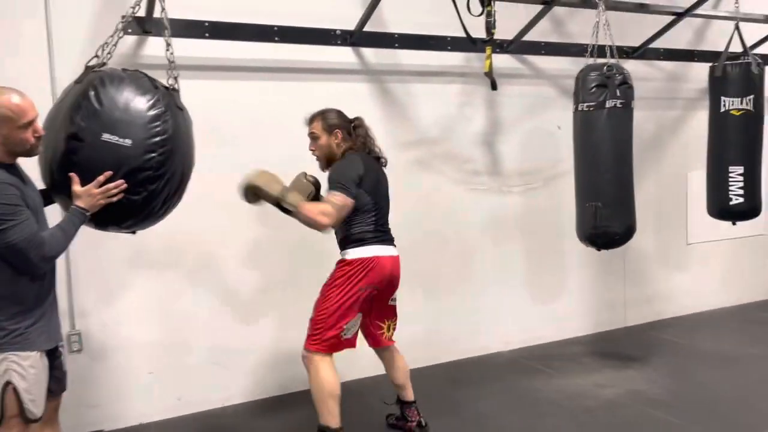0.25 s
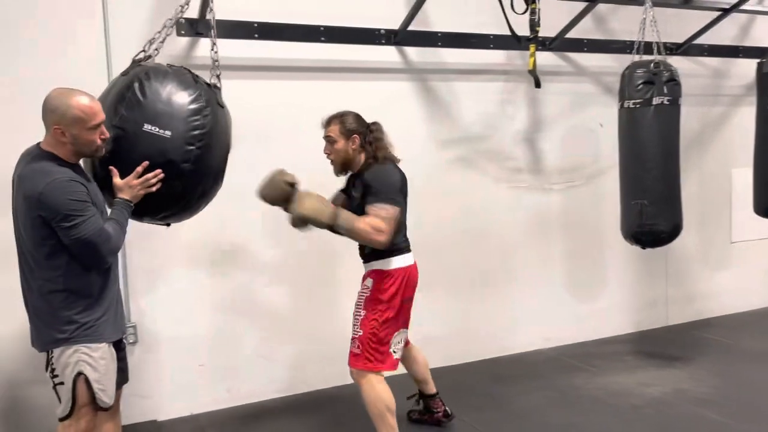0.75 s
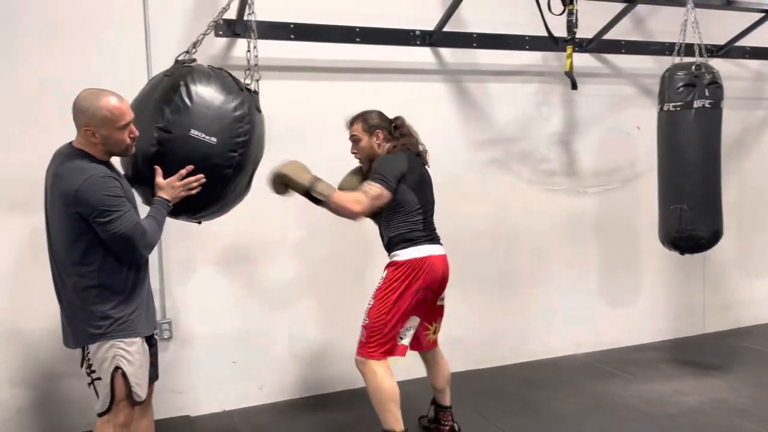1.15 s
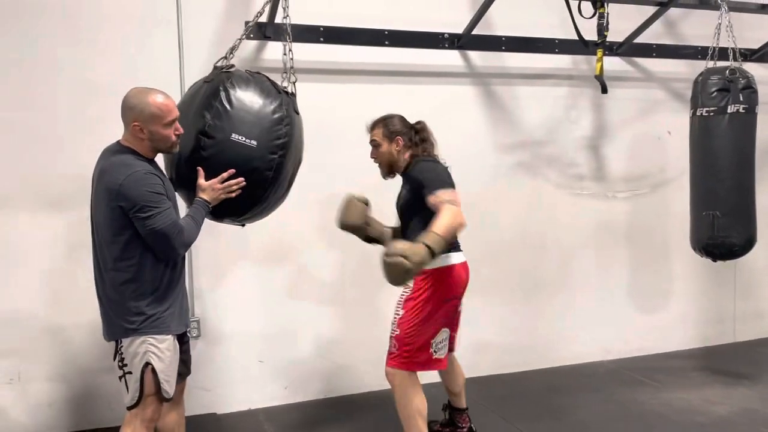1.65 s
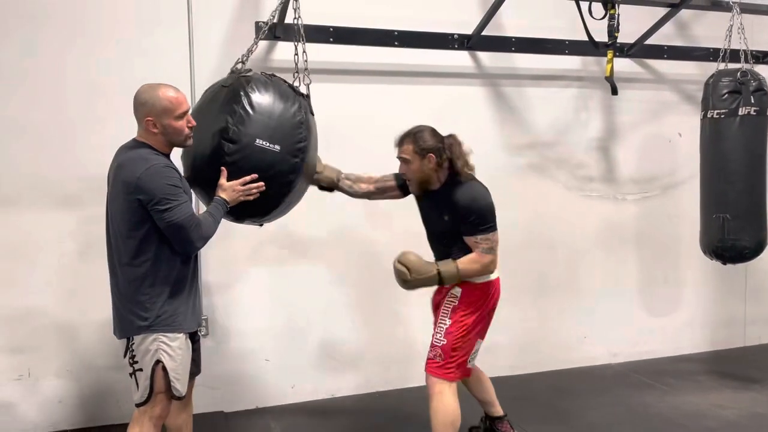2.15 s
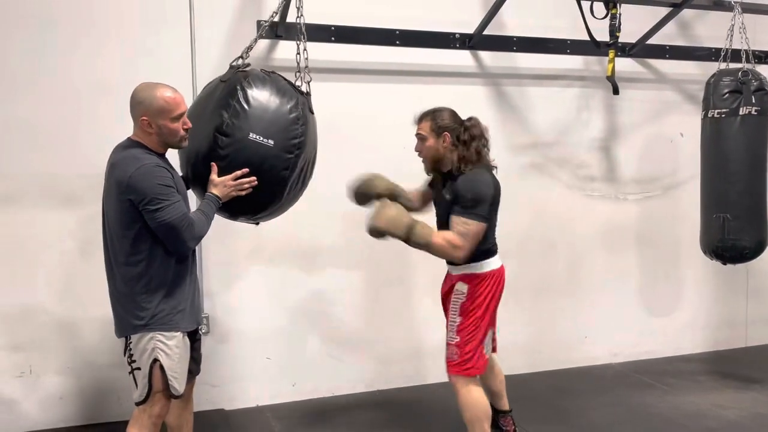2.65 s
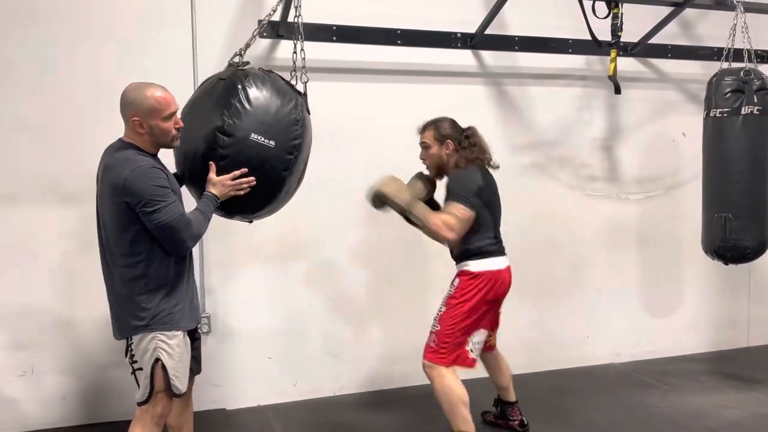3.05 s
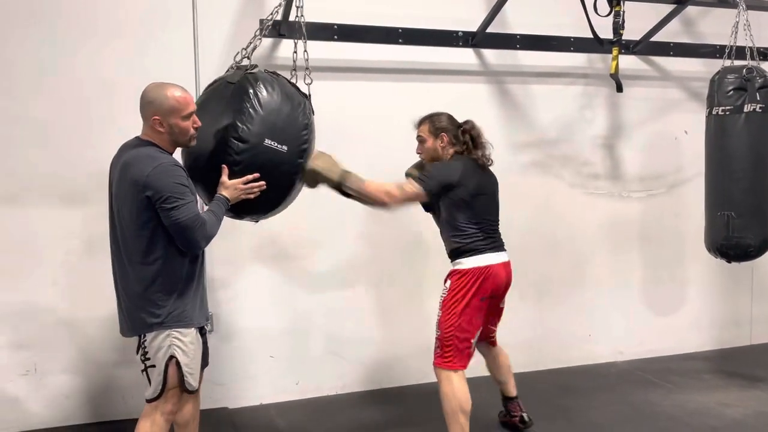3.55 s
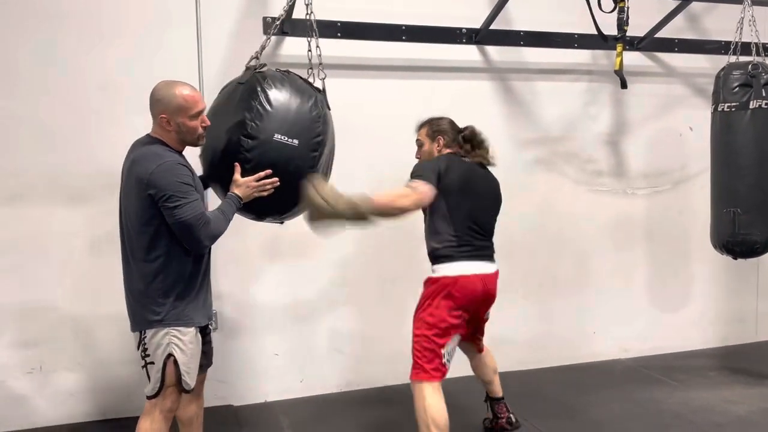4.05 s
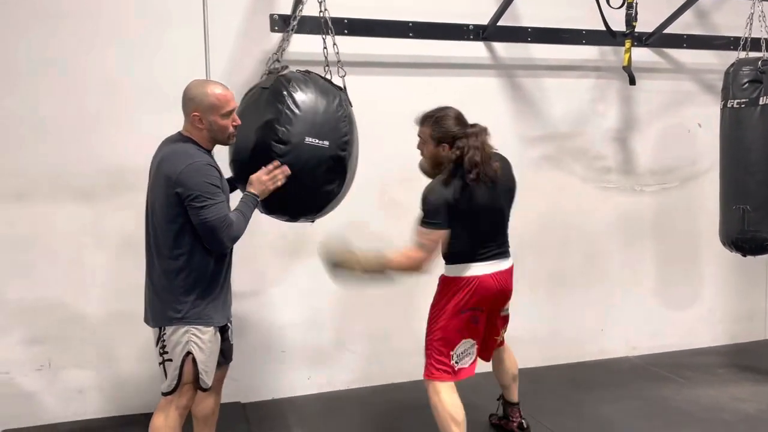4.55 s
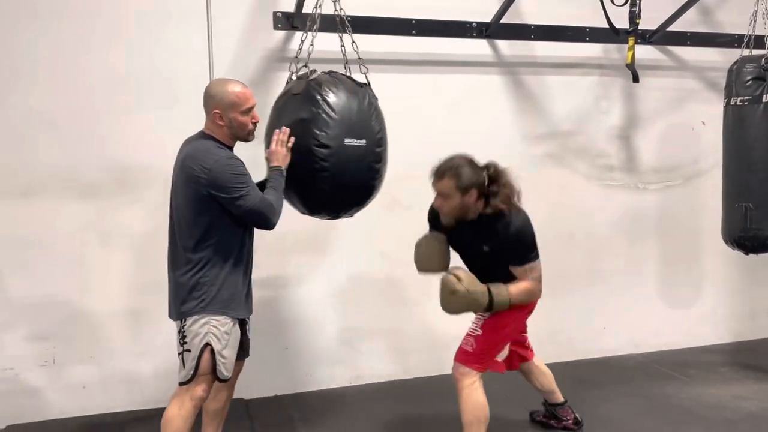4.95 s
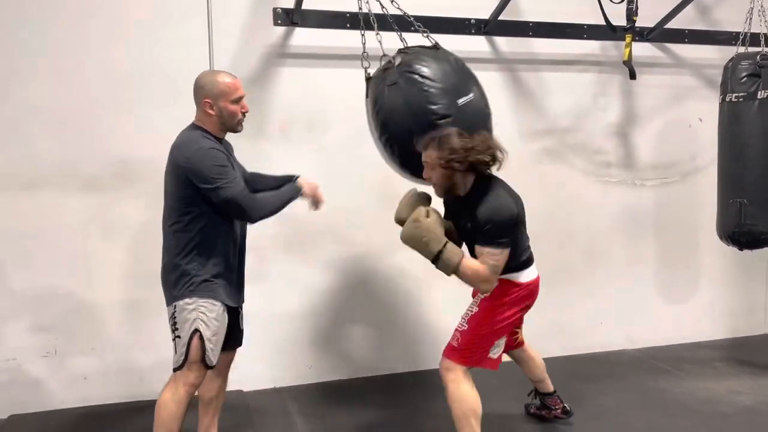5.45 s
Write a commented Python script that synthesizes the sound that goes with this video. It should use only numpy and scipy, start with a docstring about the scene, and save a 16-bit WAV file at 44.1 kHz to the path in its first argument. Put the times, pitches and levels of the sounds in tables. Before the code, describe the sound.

A heavy bag is punched in a hard-walled, reverberant gym, heard in stereo from a few metres away, the bag a little left of centre. The tail of a weak blow opens the scene, then punches land roughly every 0.3 seconds from 0.3 to 2.7, each a leathery slap with a short, hollow, padded knock and low boom. Strength varies; the blow at 2.1 is notably hard and snappy, and a small dry tick comes at 1.2. Spacing widens with blows at 3.1 and 3.6, then two powerful ones at 4.1 and 4.6, the last deepest. Soft low footfalls dot the mat. From 4.63 the chains jerk: bright links jangle and grind, with a hollow bonk and steel clatter near 4.72, then thinning clanks and tiny high squeaks until about 5.1. A faint rubbery shoe chirp comes at 5.35. Low ventilation rumble continues under the fading ring of the room.

```python
"""A heavy bag on chains takes a boxer's blows, a few metres away in a hard-walled gym.
Each blow mixes a burst of noise (the slap), short ringing tones (the knock) and a slow low boom.
After the last blow the bag drops back on its chains: steel tones jangle and wavering tones creak.
Feet land softly, and filtered noise rumbles as ventilation under the long ring of the hall."""
import sys
import numpy as np
from scipy import signal
from scipy.fft import rfft, irfft, next_fast_len
from scipy.io import wavfile
from scipy.ndimage import uniform_filter1d

SR = 44100
rng = np.random.default_rng(int(sys.argv[2]) if len(sys.argv) > 2 else 0)


def waveform_to_disk(signal):
    """Save audio, clipped to [-1, 1], as 16-bit WAV at the path in sys.argv[1]."""
    frames = np.transpose(np.atleast_2d(signal))
    scaled = np.clip(frames, -1, 1) * 32767
    samples = np.round(scaled).astype(np.int16)
    wavfile.write(sys.argv[1], SR, samples)


N = 250929
T = np.arange(N) / SR  # time in seconds

# Colour of a slap. Each row: frequency in Hz, level in dB.
SLAP_COLOUR = [(150, -7), (600, 5), (1200, 1.5), (2500, 1.5), (4000, -1), (6200, -2), (9000, 4),
               (12500, -9.5), (16000, -16)]


def undb(db):
    """Turn decibels into a gain."""
    return 10 ** (np.asarray(db) / 20)


def over_hz(hz, values, size=N):
    """Join points by straight lines over log frequency, nearly the way we hear pitch."""
    bins_hz = np.fft.rfftfreq(size, 1 / SR)
    return np.interp(np.log(bins_hz + 1), np.log(hz), values)


def colour(x, points):
    """Shape a sound by (Hz, dB) points with a filter that never acts early, so attacks stay sharp."""
    size = 2 * next_fast_len(x.shape[-1] // 2 + 2048)
    gain = undb(over_hz(*np.transpose(points), size=size))
    # folding the cepstrum (the spectrum of the log gain) gives the filter minimum phase
    cepstrum = irfft(np.log(gain))
    cepstrum[1:] *= 2 * (np.arange(1, size) < size / 2)
    shaped = irfft(rfft(x, size) * np.exp(rfft(cepstrum)))
    return shaped[..., :x.shape[-1]]


def slap_colour(tilt):
    """The slap's colour, tilted about 2 kHz by a number of dB per octave; positive is brighter."""
    return [(hz, db + tilt * np.log2(hz / 2000)) for hz, db in SLAP_COLOUR]


def unit(x):
    """Scale to an average power (rms) of 1."""
    return x / np.sqrt(np.mean(x ** 2))


def fade(t, t60):
    """Die away by 60 dB in t60 seconds."""
    return np.exp(-np.log(1000) * t / t60)


def swell(start, attack, hold, t60):
    """A loudness curve that rises, holds and dies away; all times in seconds."""
    t = T - start
    rise = np.clip(t / attack, 0, 1)
    return rise * fade(np.maximum(t - attack - hold, 0), t60)


def ring(modes, t):
    """A struck object sounds as several fading sines: (Hz, dB, t60 in seconds)."""
    return sum(undb(db) * np.sin(2 * np.pi * hz * t) * fade(t, t60) for hz, db, t60 in modes)


def add(track, at, sound):
    """Mix a mono or stereo sound in at a time, which may lie before the start."""
    i = int(at * SR)
    start = max(i, 0)
    part = sound[..., max(-i, 0):track.shape[-1] - i]
    track[..., start:start + part.shape[-1]] += part


def diffuse(size=N):
    """Noise from all around: left and right are alike in the bass, less so higher up."""
    # Stereo width. Each row: frequency in Hz, side minus middle level in dB.
    width = [(40, -34), (90, -18), (180, -14), (350, -5.5), (700, -1), (1500, -0.5), (3000, -4),
             (6000, -3.5), (11000, -0.5)]
    mid, side = rng.standard_normal((2, size))
    side = colour(side, width)
    return np.array([mid + side, mid - side])


def crack(t60):
    """Surfaces meeting make a short, dense burst of noise with a fairly even, unpitched spectrum."""
    t = T[:SR // 10]
    spectrum = rfft(rng.standard_normal(len(t)) * fade(t, t60))
    # a power of .7 takes out most of the peaks and dips
    burst = irfft(spectrum / np.abs(spectrum) ** .7) * fade(t, 4 * t60)
    return unit(burst) * np.sqrt(np.mean(fade(t, t60) ** 2))


def squeal(hz, waver):
    """Steel or rubber sticks and slips, which gives a thin tone of unsteady pitch."""
    drift = unit(uniform_filter1d(rng.standard_normal(N), size=200))
    pitch_hz = hz * (1 + waver * drift)
    return np.sin(2 * np.pi * np.cumsum(pitch_hz) / SR)


def ventilation():
    """Air rumbles as filtered noise that wavers a little, with the steady hum of its motor."""
    # Colour of the air. Each row: frequency in Hz, level in dB per Hz before overall scaling.
    air_colour = [(18, -48), (26, -26), (36, -14), (55, 6.5), (75, 3), (110, 0.5), (190, -4), (320, -8),
                  (650, -11), (1200, -17), (2200, -23), (4000, -30), (7000, -44), (12500, -53),
                  (15000, -79)]
    # Motor tones. Each row: frequency in Hz, rms level in dB.
    motor = [(53.8, -54.5), (123.8, -48.5)]
    level_db = -35
    waver_db = .7 * np.interp(T, np.linspace(0, T[-1], num=40), rng.standard_normal(size=40))
    air = unit(colour(diffuse(), air_colour)) * undb(level_db + waver_db)
    hum = 0
    for hz, db in motor:
        hum = hum + undb(db) * np.sqrt(2) * np.sin(2 * np.pi * (hz * T + rng.random()))
    return air + hum


def gym(x):
    """Hard walls answer with a dense tail whose treble dies soonest; every call has a new fine pattern."""
    # Bands of the hall. Each row: frequency in Hz, reverberation level in dB, t60 in seconds.
    bands = [(50, 11, 1.1), (131.3, 8.5, 0.79), (279, -4, 1.65), (660, -7, 3.3), (1230, 0, 2.6),
             (2300, 0.8, 2.1), (3400, 0.5, 2.6), (4700, -1.5, 1.22), (7600, -7, 0.66), (10500, -11, 0.54),
             (13000, -14, .36), (16000, -40, .2)]
    t = T[:SR]
    hz, db, t60 = np.transpose(bands)
    spectrum = rfft(diffuse(size=SR))
    # the tail starts after 4 ms and is stronger at first
    early = (1 + 1.0 * np.exp(-t / 0.12)) * np.clip((t - .004) / 0.0013, 0, 1)
    response = 0
    for share, band_db, band_t60 in zip(np.eye(len(hz)), db, t60):
        envelope = fade(t, band_t60) * early
        envelope /= np.sqrt(np.sum(envelope ** 2))
        band = irfft(spectrum * over_hz(hz, share, size=SR))
        response = response + undb(band_db) * envelope * band
    return signal.fftconvolve(x[None], response, axes=1)


def glove(tilt):
    """Knuckles slap first, the glove follows and the cover crumples; a flat landing is brighter."""
    crease_spread_db = 4  # unevenness of the creases
    skin, t = np.zeros(SR // 2), T[:SR // 10]
    grains = undb(crease_spread_db * rng.standard_normal(size=100)).repeat(45)
    creases = unit(uniform_filter1d(grains, size=20))[:len(t)]
    add(skin, 0, undb(5.5) * crack(t60=0.0048) * (1 - np.exp(-t / 0.00056)))  # knuckles
    add(skin, .0032, undb(-10.5) * crack(t60=0.013))  # rest of the glove
    add(skin, 0, undb(-13.5) * crack(t60=0.056) * creases)  # crumpling cover
    return colour(skin, slap_colour(tilt))


def shudder(pitch_hz, t60):
    """The filling shifts and settles as soft noise, higher where the cover is taut."""
    # Colour of the filling. Each row: multiple of its pitch, level in dB.
    filling = [(.18, -0.5), (.4, -7), (.72, 18), (1.15, 20.5), (1.8, 2.5), (3, -9), (7.5, -12), (24, -39)]
    t = T[:SR // 2]
    shifting = rng.standard_normal(len(t)) * fade(t, t60) * (1 - np.exp(-t / 0.013))
    return colour(shifting, [(ratio * pitch_hz, db) for ratio, db in filling])


def knock(pitch_hz):
    """The glove's padding compresses over a few milliseconds and rings briefly."""
    # Tones of the padding. Each row: multiple of the knock pitch, level in dB, t60 in seconds.
    padding = [(.7, -15.5, 0.048), (1.0, 7, 0.028), (1.4, -14.5, 0.087), (2.07, 3, 0.023),
               (2.55, -15.5, 0.055), (3.7, 0.5, 0.013)]
    t = T[:SR // 5]
    modes = [(ratio * pitch_hz, db, t60) for ratio, db, t60 in padding]
    return -ring(modes, t) * (1 - np.exp(-(t / 0.0027) ** 2))


def clap():
    """Air trapped between glove and bag escapes with a hollow clap."""
    # Colour of the clap. Each row: frequency in Hz, level in dB.
    hollow = [(120, 1), (250, 6.5), (470, 14.5), (750, 7.5), (1300, 1.5), (2200, -4), (5000, -22)]
    return colour(crack(t60=0.038), hollow)


def boom():
    """The mass of the bag takes up the blow slowly and wobbles at low pitches."""
    # Tones of the whole bag. Each row: frequency in Hz, level in dB, t60 in seconds.
    whole_bag = [(62.5, 15, 0.13), (52.66, -5.5, 0.73), (107.7, -11, 0.19)]
    t = T[:SR]
    return ring(whole_bag, t) * (1 - np.exp(-(t / 0.024) ** 3))


def punches():
    """Each blow slaps, knocks, claps, shudders and booms; the far wall and the hall answer."""
    # The blows. Each row: start in seconds, force in dB, slap tilt in dB per octave,
    # shudder of the filling in dB (before a fixed 10 dB cut), shudder pitch in Hz, room level in dB,
    # delay from slap to knock and clap in seconds, clap level in dB.
    blows = [(-.06, -30.5, 5.5, -28, 318, 0.5, 0.00083, -29), (0.3115, -25, 1.5, -30, 264, 3, 0.00041, -28),
             (.567, -18, 0.5, -22.5, 380, 0, 0.00091, -21),
             (0.8475, -18.5, -4, -26, 330, -1.5, 0.00053, -22.5),
             (1.1769, -23.5, 1.0, -26.5, 314, 1, 0.003, -24.5),
             (1.5041, -16, -1.5, -19.5, 275, -1.5, 0.0018, -22.5),
             (1.819, -17.5, 0.2, -22, 270, 2, 0.0022, -23.5), (2.1172, -11, 0.4, -21, 335, 6, 0.0027, -16),
             (2.41, -16.5, 1.9, -20.5, 285, -1, 0.00043, -20.5),
             (2.702, -21.5, -2, -27, 291, 0.5, .003, -22.5),
             (3.136, -22, 0.8, -19, 441, 3.5, 0.0042, -18.5),
             (3.58, -19.5, 0.5, -26, 350, 3.5, 0.00098, -15.5),
             (4.071, -9.5, 1.7, -19, 375, 0, 0.00024, -13.5), (4.5775, -9, 1.8, -17, 230, -1, 0.00034, -11)]
    # Hooks that sink in and boom more. Each row: start in seconds, level of the added boom in dB.
    hooks = [(1.82, -34), (2.119, -13.5)]
    # Colour of the far wall's echo. Each row: frequency in Hz, level in dB.
    far_wall = [(60, -26), (200, -12.5), (450, -9.5), (1000, -11.5), (2500, -23), (8000, -32)]
    echo_s = .067
    # a harder blow presses more padding flat, so it knocks lower and slaps relatively less
    firm_db, knock_sag_hz_per_db, slap_growth = -11.5, 1.5, 0.85
    # the knock's pitch at firm force; slap at firm force and boom at any force, relative to the force
    knock_hz, slap_rel_db, boom_rel_db = 289, -3, -14
    near, hall = np.zeros(N), np.zeros((2, N))
    for at, force_db, tilt, shudder_db, shudder_hz, room_db, sink, clap_db in blows:
        harder_db = force_db - firm_db
        slap_db = firm_db + slap_rel_db + slap_growth * harder_db
        blow = undb(slap_db) * glove(tilt)
        blow += undb(shudder_db - 10) * shudder(shudder_hz, t60=0.53)
        add(blow, sink, undb(force_db) * knock(knock_hz - knock_sag_hz_per_db * harder_db))
        add(blow, sink, undb(clap_db) * clap())
        add(near, at, blow)
        add(near, at + echo_s, colour(blow, far_wall))
        add(near, at, undb(force_db + boom_rel_db) * boom())
        add(hall, at, undb(room_db) * gym(blow))
    for at, db in hooks:
        add(near, at, undb(db) * boom())
    return near, hall


def snaps():
    """Folds of glove and bag cover clap shut with sharp snaps, each brighter or duller by its tilt."""
    # The snaps. Each row: start in seconds, level in dB, tilt in dB per octave.
    folds = [(0.3188, -26, 3), (0.321, -24.5, 3), (0.5598, -24, 2.5), (0.564, -33, 0), (0.5707, -23.5, 2.5),
             (0.837, -21, 0.5), (0.8395, -20, -1), (0.8496, -15.5, -3.5), (0.8521, -15, -4),
             (1.1803, -38, 3), (1.5115, -27, 0.5), (2.1212, -15.5, 1), (2.124, -10.5, -1),
             (2.1286, -16, -2.5), (2.4135, -25, 3.5), (2.704, -23, 0.5), (3.1394, -25, 0), (3.144, -33, -3),
             (3.5865, -31, -2), (3.591, -19.5, -3.5), (3.608, -25, 1), (3.615, -25.5, 0.5),
             (4.074, -15.5, 1), (4.587, -14, -1.5)]
    out = np.zeros(N)
    for at, db, tilt in folds:
        add(out, at, undb(db) * colour(crack(t60=0.0038), slap_colour(tilt)))
    return out


def steps():
    """Soft landings on the mat set the floor and the room's lowest modes going."""
    # Feet landing. Each row: start in seconds, level in dB.
    landings = [(0.699, -52), (2.245, -29), (2.323, -25), (2.377, -26.5), (2.589, -30.5), (3.239, -30),
                (3.62, -32), (4.336, -37), (4.627, -22), (4.779, -23.5)]
    out, t = np.zeros(N), T[:SR]
    floor = [(56.5, 6.0, 0.33), (72.4, -2, 0.17), (141.2, -10, 0.22)]  # (Hz, dB, t60 in seconds)
    for at, db in landings:
        add(out, at, undb(db) * ring(floor, t) * (1 - np.exp(-t / 0.01)))
    return out


def tick():
    """One dry tick of contact noise as the bag recoils, probably from a strap."""
    out = np.zeros(N)
    tone = [(800, -16), (2400, 1.5), (4500, -2), (6500, -18), (11000, -30)]  # (Hz, dB)
    add(out, 1.2158, undb(-17.5) * colour(crack(t60=0.0037), tone))
    return out


def thump():
    """The last blow sinks deep into the core of the bag, which rings low and briefly."""
    # Tones of the core. Each row: frequency in Hz, level in dB, t60 in seconds.
    core = [(126, 0, 0.053), (393, -9, 0.05)]
    out, t = np.zeros(N), T[:SR // 2]
    add(out, 4.585, undb(-8) * ring(core, t) * (1 - np.exp(-t / .003)))
    return out


def grind():
    """Links rub as the chain takes the load: squeals at several pitches and a thin whistle."""
    # Pitches of the squeals. Each row: frequency in Hz, level in dB.
    pitches = [(4600, -5), (4790, -4.5), (4900, -7), (5120, -8), (5420, -5), (5800, -9), (6170, -7)]
    start_s = 4.632
    load = undb(-38) * swell(start_s, attack=0.0091, hold=0.021, t60=0.72)
    whistle = undb(-37) * swell(start_s, attack=.01, hold=.012, t60=.16) * squeal(13500, waver=.008)
    return load * sum(undb(db) * squeal(hz, waver=0.04) for hz, db in pitches) + whistle


def chains():
    """Links of different sizes clash in bunches, some much harder; each jerk also tugs the bag."""
    # Jerks of the chains. Each row: start in seconds, link rattle in dB (before fixed cuts),
    # length in seconds, tug on the bag in dB (before a fixed 2 dB lift), tug pitch in Hz.
    jerks = [(4.634, -33.5, 0.031, -20, 300), (4.668, -41, .035, -28, 266), (4.699, -33.5, 0.021, -23, 168),
             (4.715, -22, .018, -12.5, 317), (4.745, -36, .07, -20, 271)]
    # Tones of a link. Each row: frequency in Hz, level in dB, t60 in seconds (the first two vary below).
    link_modes = [(4770, -13, 0.11), (5500, -21, 0.07), (6130, -15, 0.066), (6850, -7, 0.09),
                  (9000, 10.5, 0.074), (9700, 0, 0.04), (10600, 0, 0.06), (11100, 1.5, 0.06),
                  (11300, -1.5, 0.077), (12150, -5, .04), (13550, -9, 0.04)]
    clash_spread_db = 16  # widest range from softest to hardest clash in a bunch
    out, t = np.zeros(N), T[:SR // 8]
    for at, db, length, tug_db, tug_hz in jerks:
        clashes = rng.random(size=(18, 2))
        forces = unit(undb(clash_spread_db * clashes[:, 1]))
        for when, force in zip(clashes[:, 0], forces):
            # the size of a link shifts its modes, the point of contact weights them
            link = [(hz * (1 + 0.03 * rng.standard_normal()), gain_db + 3 * rng.standard_normal(), t60)
                    for hz, gain_db, t60 in link_modes]
            contact = colour(crack(t60=0.003), SLAP_COLOUR)
            add(out, at + when * length, undb(db - 13.0) * force * ring(link, t))
            add(out, at + when * length, undb(db - 17) * force * contact)
        add(out, at, undb(tug_db + 2.0) * shudder(tug_hz, t60=0.12))
    return out


def creak():
    """The hook sticks and slips as the bag swings: a row of thin squeaks around one pitch."""
    # The slips. Each row: start in seconds, level in dB, hold in seconds.
    squeaks = [(4.704, -41.5, .004), (4.935, -37, 0.0081), (4.968, -42.5, 0.037), (5.037, -39.5, 0.0085),
               (5.064, -51, 0.028), (5.125, -60, .02)]
    slips = sum(undb(db) * swell(at, attack=0.0031, hold=hold, t60=0.02) for at, db, hold in squeaks)
    return slips * squeal(4430, waver=0.0032)


def bonk():
    """The bag drops back and the frame that takes its weight rings with a hollow bonk."""
    # Tones of the frame. Each row: frequency in Hz, level in dB, t60 in seconds.
    frame = [(245, 1.5, 0.21), (360, -7, .15), (563, -3.5, 0.28), (636, -2, 0.11)]
    out, t = np.zeros(N), T[:SR // 2]
    add(out, 4.722, undb(-25.5) * ring(frame, t) * (1 - np.exp(-t / 0.0094)))
    return out


def shackle():
    """The shackle chatters on the beam; each clank rings at slightly new pitches as the load shifts."""
    # The clanks. Each row: start in seconds, ring level in dB, clatter level in dB.
    clanks = [(4.725, -42.5, -29), (4.741, -37.5, -23.5), (4.766, -41.5, -29.5), (4.802, -42.5, -37),
              (4.857, -47, -35), (4.905, -45.5, -46), (4.985, -54, -45), (5.09, -58, -53)]
    # Tones of beam and shackle. Each row: frequency in Hz (varied below), level in dB, t60 in seconds.
    steel_modes = [(1089, 0, 0.16), (1405, -8, 0.1), (1713, -2, 0.18), (1866, 1.5, 0.2), (1958, 4.5, 0.23),
                   (2020, -1, .13), (2126, 1, 0.12), (2185, -1.5, 0.12), (2330, -2, .14), (2436, 0, 0.15),
                   (2560, -2, 0.15), (2760, -5, .14), (2780, -9, .1), (3700, -11, 0.098)]
    rattle = [(200, -12), (650, 18.0), (2300, 0.5), (5000, 1.0), (12000, -16)]  # (Hz, dB)
    out, t = np.zeros(N), T[:SR // 2]
    for at, db, clatter_db in clanks:
        for hz, gain_db, t60 in steel_modes:
            # loose contact makes each mode buzz on its own
            buzz = 1 + .6 * unit(uniform_filter1d(rng.standard_normal(len(t)), size=300))
            mode = (hz * (1 + 0.0091 * rng.standard_normal()), gain_db, t60)
            add(out, at, undb(db) * ring([mode], t) * buzz)
        add(out, at, undb(clatter_db) * colour(crack(t60=0.068), rattle))
    return out


def hardware():
    """The steel the bag hangs from: rattling and grinding links and the shackle."""
    return chains() + shackle() + grind()


def scuff():
    """A shoe pivots as the boxer ducks; its sole twists on the mat with a low, rubbery chirp."""
    pitch_hz = 758
    rub = squeal(pitch_hz, waver=0.0355) + undb(-12) * squeal(pitch_hz * 0.61, waver=0.058)
    return undb(-43) * swell(5.338, attack=.012, hold=0.07, t60=.08) * rub


def from_left(x, lag_ms):
    """The bag hangs left of centre: the right microphone hears it later and mostly softer."""
    # Lean of the direct sound. Each row: frequency in Hz, left minus right in dB.
    pan = [(100, .3), (500, 2), (2000, 4.5), (4500, 6), (8000, 1), (12000, 0)]
    spectrum = rfft(x)
    lean = undb(over_hz(*np.transpose(pan)) / 2)
    late = np.exp(-2j * np.pi * np.fft.rfftfreq(N, 1 / SR) * lag_ms / 1000)
    return irfft(spectrum * np.array([lean, late / lean]), N)


def scene():
    """Bag, chains and shoe, direct and through the hall, over soft steps and the ventilation."""
    blows, hall = punches()
    small = snaps() + tick() + scuff() + bonk()
    steel, hook = hardware(), creak()
    direct = from_left(blows + thump() + small + undb(-4.5) * steel + undb(-4) * hook, lag_ms=0.025)
    tail = gym(small + undb(-3.0) * steel + undb(-6) * hook)[:, :N]
    return direct + hall + tail + steps() + ventilation()


def record(dry):
    """The sound has a deep, narrow gap near 8 kHz; loud peaks are rounded and the very top is cut."""
    tone = [(6800, 2), (7500, -6.5), (8300, -31.5), (9300, -7),
            (10500, 1), (13000, 3.0), (16000, -10)]  # (Hz, dB)
    heard = colour(dry, tone)
    ceiling, top_hz = .7, 16400
    rounded = ceiling * np.tanh(heard / ceiling)
    return signal.sosfilt(signal.ellip(8, .2, 70, top_hz, fs=SR, output="sos"), rounded)


dry = scene()
out = record(dry)
waveform_to_disk(out)
```